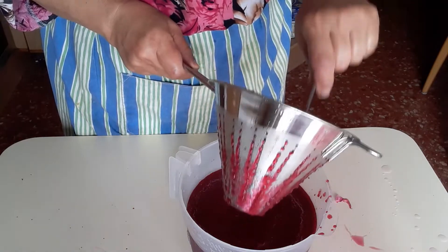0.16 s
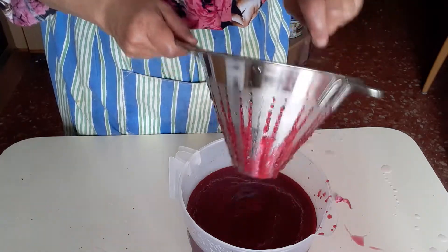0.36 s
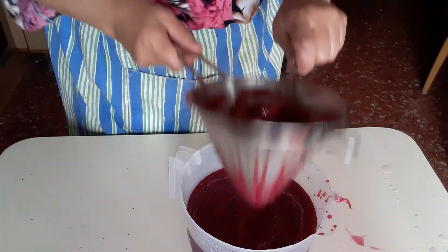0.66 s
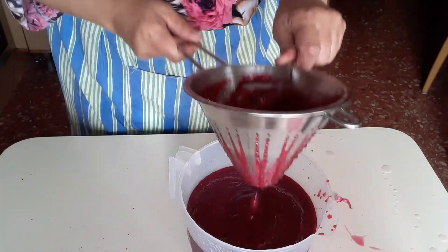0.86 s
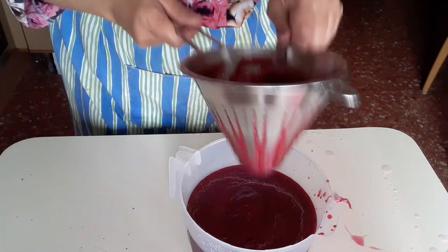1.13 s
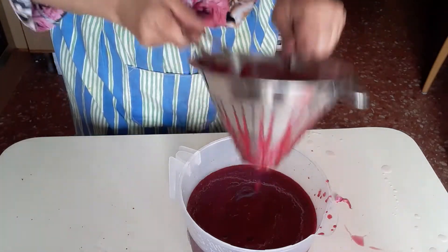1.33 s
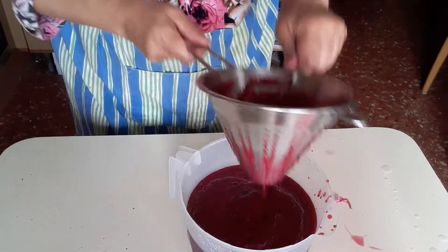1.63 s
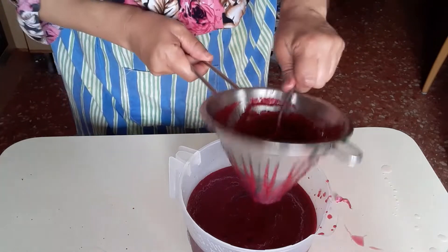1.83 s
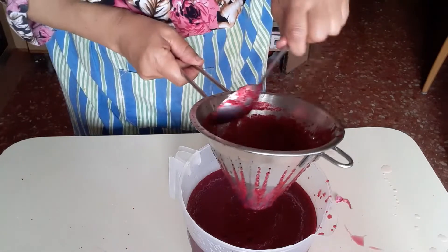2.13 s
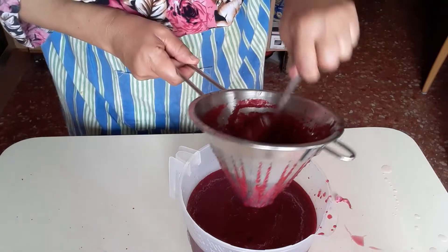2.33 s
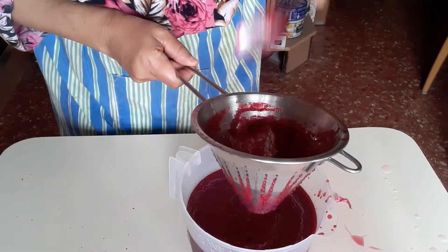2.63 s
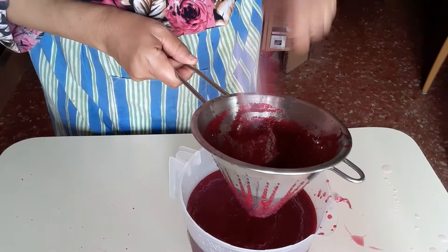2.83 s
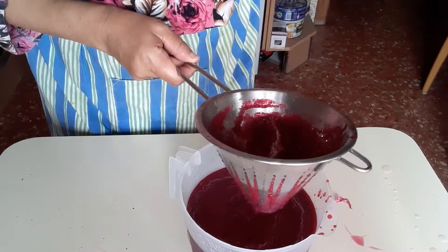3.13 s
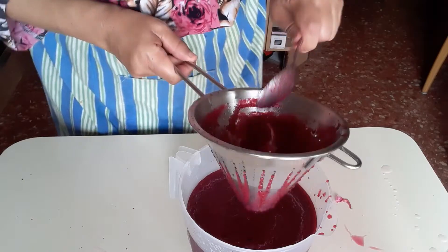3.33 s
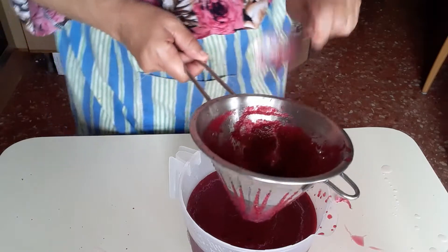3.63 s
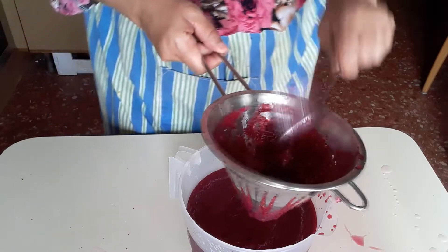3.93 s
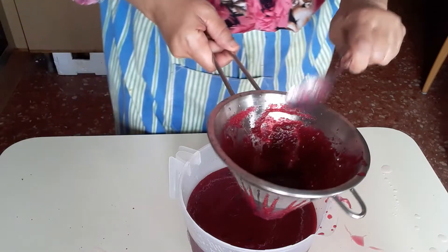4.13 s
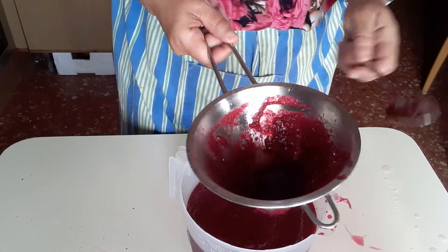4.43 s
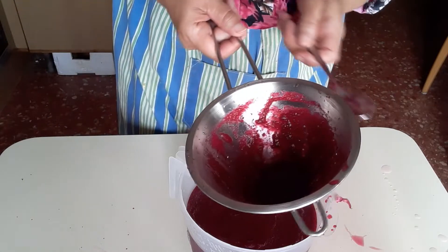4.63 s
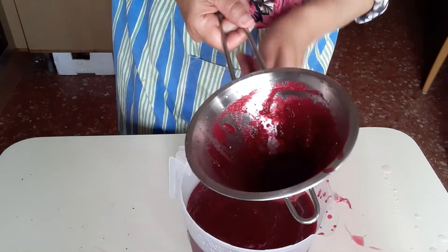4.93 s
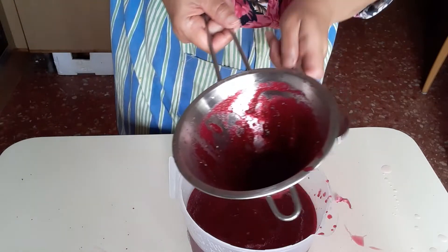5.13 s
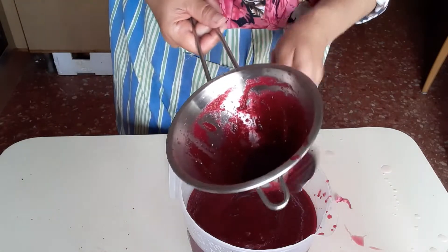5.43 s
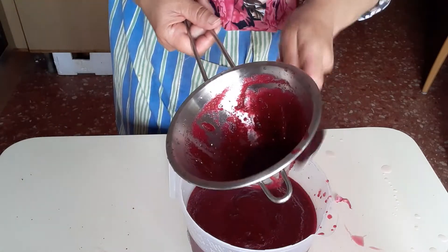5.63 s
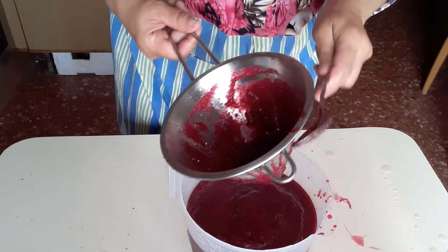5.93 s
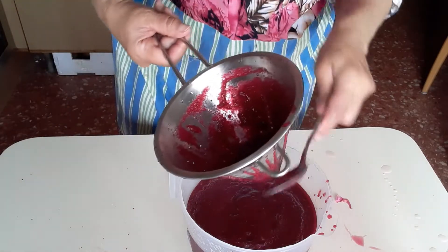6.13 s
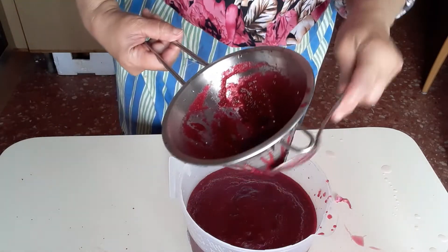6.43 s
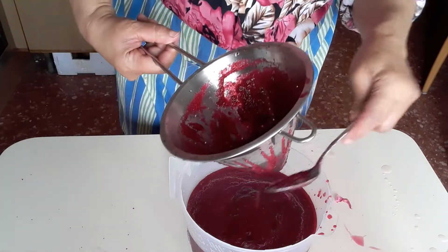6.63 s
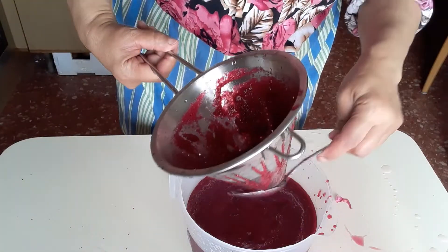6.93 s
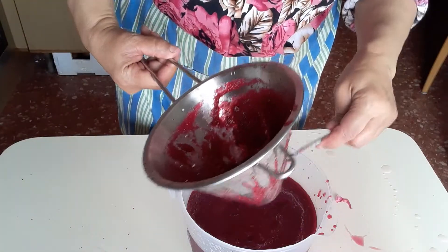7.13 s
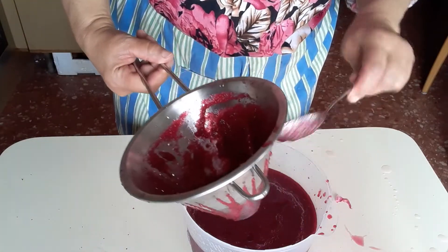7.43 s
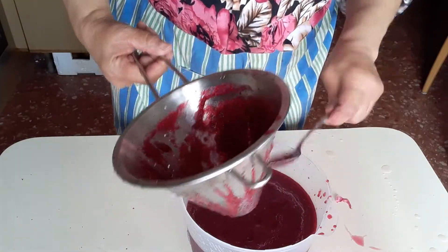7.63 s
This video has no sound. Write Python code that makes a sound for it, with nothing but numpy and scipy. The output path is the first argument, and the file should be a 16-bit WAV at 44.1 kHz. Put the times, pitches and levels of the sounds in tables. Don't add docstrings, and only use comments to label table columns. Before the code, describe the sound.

Short, bright metal knocks, damped by wet pulp, ring briefly in a reflective little kitchen. First come paired sharp raps, then a cluster of clanks and a wet scrape, then near quiet with faint squelchy rubbing. A heavy crack with fast rebounds breaks it, followed by coarse scrapes and clearer pinging taps along a perforated steel cone. Close microphones also pick up slight dripping, low outdoor traffic and faint electronic hiss.

```python
import sys
import numpy as np
from scipy import signal
from scipy.fft import rfft, irfft, next_fast_len
from scipy.io import wavfile

SR = 44100
rng = np.random.default_rng(int(sys.argv[2]) if len(sys.argv) > 2 else 0)


def transcribe(u):
    v = np.clip(np.atleast_2d(u).T, -1, 1)
    q = np.round(v * 32767).astype(np.int16)
    wavfile.write(sys.argv[1], SR, q)


def to_linear_factor(level_db):
    exponent = np.asarray(level_db, float) / 20
    return 10 ** exponent


N = 342657

# (frequency [Hz], width [Hz], level [dB])
RIM = [(1130, 51, -12), (1316, 54, -8), (2030, 100, -0.5), (2100, 39, -17), (2740, 21, -6.5),
       (2970, 110, -0.5), (4200, 120, -1.5), (6060, 60, -7), (6414, 100, -9.5), (7800, 90, -10),
       (9090, 100, -15.5), (9880, 60, -11), (10900, 240, -8), (12200, 120, -10.5), (13400, 120, -17.5)]
HANDLE = [(2600, 100, -1.5), (3430, 240, -2), (5900, 460, -13)]
UNDER_RIM = [(970, 240, -10), (1330, 73, -3), (2024, 67, 7), (3120, 120, -0.5), (4120, 200, -2.5),
             (6200, 150, -15)]
INNER_EDGE = [(421.3, 92, -10), (820, 200, 2), (1524, 39, 11.5), (2616, 200, -6)]
OUTER_EDGE = [(970, 120, -7.5), (1730, 370, 4.5), (2480, 210, 6.5), (4750, 60, -3), (6960, 37, -32)]
INNER_LOW = [(610, 530, -7.5), (1008, 52, -9), (1640, 40, -4.5), (2230, 250, -2.5), (3700, 41, -8.5),
             (6400, 39, -11)]
INNER_MID = [(840, 120, -1), (1640, 25, 3.5), (2400, 19, 0.5), (3400, 32, -3), (5414, 37, -13),
             (7670, 40, -21)]
INNER_HIGH = [(810, 290, -8), (1630, 14, 4.5), (2032, 98, -0.5), (2410, 290, -2.5), (3300, 170, -4.5),
              (5100, 210, -9.5), (6560, 64, -4), (7150, 92, -14.5), (9100, 50, -8.5), (11450, 65, -9)]
PULP_BED = [(945, 140, -2.5), (1380, 29, -7.5), (2250, 80, -9), (3356, 35, -0.5), (4470, 410, -6),
            (5170, 270, -6), (6140, 500, -8.5), (8270, 130, -9), (9580, 160, -10.5), (11040, 400, -12),
            (12900, 55, -14.5), (14250, 100, -21)]
OUTER_HIGH = [(944, 5.9, 3), (1850, 31, 1.5), (2270, 25, -5), (2810, 58, 2), (3490, 50, -24),
              (4110, 23, -16), (5430, 21, -7)]
OUTER_RIM = [(870, 40, 9.5), (1004, 5.7, -0.5), (1320, 24, -12.5), (2330, 32, 1), (3400, 100, -17),
             (4170, 200, -6), (5230, 32, -2)]
OUTER_MID = [(871, 6.7, 16.5), (1600, 11, -4), (1871, 12, 6.5), (2500, 20, 0.5), (4000, 17, -14.5),
             (5260, 20, -6)]
DENT = [(847, 6.7, 7.5), (1080, 100, -15), (1900, 90, -2), (3600, 40, -3)]
OUTER_LOW = [(780, 30, -2.5), (1060, 44, -1), (1810, 50, 8), (2500, 180, 0.5), (3580, 370, 3.5),
             (4750, 44.1, -4.5)]
NEAR_TIP = [(982, 48, 1.5), (1896, 4.3, 4.5), (2135, 20, -8), (4700, 70, -15.5)]
SEAM = [(880, 310, -11.5), (960, 82, -8), (3390, 53, 6.5), (4670, 84, -0.5), (6060, 110, 1.5),
        (9220, 33, 4), (8360, 35, -9.5), (10400, 170, -5.5), (12790, 50, -11), (13700, 82, 2),
        (14400, 80, -16)]
TIP = [(887, 91, -2.5), (2620, 41, -6.5), (3320, 17, 3.5), (3660, 150, 2.5), (4750, 50, 3.5),
       (6050, 190, 3), (8070, 44, 1.5), (9150, 85, 0), (10900, 60, -15.5), (12100, 31, 8.5),
       (13020, 20, 10.5), (14600, 40, 10.5), (15400, 50, 1.5)]
TIP_EDGE = [(890, 136, -1.5), (3450, 36, 8), (4840, 90, 0), (6270, 65, -1), (7700, 60, -15), (9150, 150, 5),
            (12300, 40, -2), (13050, 50, 5)]
HOLES = [(3600, 110, 1), (5630, 170, -1), (8250, 34, 5.5), (9500, 300, -1), (12400, 80, 7), (15400, 110, 2)]
# (frequency [Hz], width [Hz], share removed [0-1])
RIM_NODES = [(2560, 250, 0.7), (5850, 200, 1), (6760, 250, .8), (7600, 200, .8), (8600, 580, 0.5),
             (9505, 230, .9), (10250, 150, .8), (11250, 350, .7), (13100, 700, .8), (13900, 500, .7)]
BED_NODES = [(744, 180, 0.62), (2590, 230, .9), (5700, 390, 1), (6900, 320, .93), (8600, 250, .93),
             (13500, 700, .93)]
TIP_NODES = [(2770, 120, .85), (4540, 170, .97), (5550, 250, .85), (7400, 500, .97), (8630, 250, .95),
             (11600, 300, 0.93), (11900, 300, .9), (14150, 300, .85), (14900, 300, 0.92)]
SEAM_NODES = [(4350, 210, .9), (5100, 300, .93)]
EDGE_NODES = [(4200, 150, .8), (4400, 250, .95), (5650, 200, .8)]
UNDER_NODES = [(2500, 240, 0.76), (5700, 250, .93)]


def knocks(spread, broad_db):
    # (frequency [Hz], width [Hz], level [dB])
    air_modes = [(339, 14, -1), (419.6, 14, 0), (260, 1400, -25)]
    # (frequency [Hz], width [Hz], level [dB])
    spoon_modes = [(9080, 370, 0), (10300, 210, -6), (12200, 260, -7), (9200, 11000, -7)]
    # (place, boom [dB], low wall [dB], knocks (time [s], peak [dB], edge [dB], room share [dB]), nodes..)
    blow_table = [ (HANDLE, -42, -11, [(0.0164, -55, -10, -6.5), (0.0942, -33, -12, 11)]),
                  (PULP_BED, -27.5, 0, [(3.9585, -3, -16.5, 9.5), (3.982, -15.5, -17.5, 9.5),
                  (4.004, -15.5, -16.5, 12.5), (4.028, -17.5, -22, 12.5)], *BED_NODES),
                  (RIM, -27.5, 6.8, [(0.8525, -6.5, -13.5, 9), (.8548, -15, -10, 7.5)], *RIM_NODES),
                  (RIM, -28, 9, [(0.9812, -6.5, -27.5, 0)], *RIM_NODES),
                  (UNDER_RIM, -27, 5.4, [(1.5928, -23, -18, 9), (1.724, -21, -16, 4)], *UNDER_NODES),
                  (INNER_LOW, -19, -0.54, [(1.8657, -20.5, -10.5, 9.5)]),
                  (INNER_MID, -28, 1, [(2.1839, -16.5, -11.5, 9.5)]),
                  (INNER_EDGE, -18.5, 0.5, [(2.3106, -16, -3, 6)]),
                  (INNER_HIGH, -24, 2.1, [(2.359, -5.5, -13.5, 4.5)]),
                  (OUTER_HIGH, -20.5, 1, [(5.253, -21, -12.5, 11.5), (5.273, -24, -15.5, 11.5)]),
                  (OUTER_RIM, -16.5, 1, [(4.7835, -23.5, -14, 8)]),
                  (SEAM, -36, 5.2, [(5.4715, -9.5, -13.5, 9)], *SEAM_NODES),
                  (OUTER_MID, -32.5, -12, [(5.6246, -11.5, -14.5, 8), (5.632, -16, -12, 3),
                  (5.642, -21.5, -19, 3.5), (5.9638, -17.5, -11.5, 6)]),
                  (OUTER_LOW, -48.5, -1, [(6.121, -18, -20, 4.5)], (1350, 500, .7), (6500, 3300, 0.43)),
                  (DENT, -51, 0, [(6.4925, -30, -23, 7)]), (OUTER_EDGE, -39, 12, [(6.7501, -23, -17, 11)]),
                  (NEAR_TIP, -35.5, 1.3, [(6.3345, -13, -26, 2.5), (5.708, -26.5, -20, -1),
                  (5.733, -27, -19.5, -8)], (2800, 820, 0.65), (4500, 670, .8), (7100, 5000, .8),
                  (1400, 540, .6)), (TIP, -40, 4.4, [(6.2746, -12.5, -10.5, 11)], *TIP_NODES),
                  (TIP_EDGE, -24.5, 8.5, [(6.9795, -19, -10.5, 6)], *EDGE_NODES),
                  (HOLES, -58, -17.5, [(5.706, -31.5, 3, -3), (5.734, -26.5, -7, -8.5),
                  (6.481, -40.5, -11, 6), (6.506, -30.5, -17, 5.5)]), ]
    out = np.zeros((2, N))

    def power(rows, f):
        return sum(abs(modes([row])(f)) ** 2 for row in rows)

    boom = struck(lambda f: power(air_modes, f) / (1 + (210 / (f + 1)) ** 4))
    edge = struck(lambda f: power(spoon_modes, f))
    for wall, boom_db, low_db, blows, *nodes in blow_table:
        rows = [(hz, 40 + spread * w, level + low_db * (hz < 1400)) for hz, w, level in wall]
        rest = [(3350, 4100, broad_db), (850, 310, broad_db + low_db - 7.0)]
        body = struck(lambda f: power(rows, f) / (1 + (f / 15000) ** 4)
                      + power(rest, f) / (1 + (f / 11000) ** 4))
        for s, db, edge_db, wet_db in blows:
            ring = body + to_linear_factor(boom_db) * boom + to_linear_factor(edge_db + 6.5) * edge
            knock = to_linear_factor(db + 2.5) * filtered(ring, gaps(nodes))
            add(out, s, kitchen(knock, wet_db, early_db=-4.5))
    return out


def struck(power):
    cepstrum = irfft(np.log(power(np.fft.rfftfreq(8192, 1 / SR)) + 1e-12) / 2)
    cepstrum = cepstrum * np.r_[1, np.full(4095, 2), 1, np.zeros(4095)]
    ring = irfft(np.exp(rfft(cepstrum)))[:SR // 8]
    return ring / abs(ring).max()


def gaps(nodes):
    def response(f):
        notches = [1 - np.clip(share, 0, .99) * modes([(hz, w, 0)])(f) for hz, w, share in nodes]
        return np.prod(notches + [f ** 0], axis=0)
    return response


def strokes(rows, bending, bands):
    # (frequency [Hz], level [dB])
    drag_colour = [(300, -27), (700, -9.5), (1500, -3.5), (3000, 0.5), (5000, -2), (8000, -9),
                   (16000, -20.5)]
    # (frequency [Hz], level [dB])
    fizz_colour = [(3000, -25.5), (6000, -8), (9000, 3.5), (13000, -1.5), (16000, -15)]
    # (frequency [Hz], width [Hz], level [dB])
    wall_modes = [(1660, 91, -2), (2470, 340, 0), (3440, 140, 1.5), (4770, 370, -2.5), (6140, 270, 2.5),
                  (8500, 160, -3.5), (9800, 200, 5), (12300, 200, 11)]
    ends_db, roundness = -19.5, 1.79
    out = np.zeros((2, N))
    for s, lead, release, db, wet_db in rows:
        t, (away,), fade = played([(max(s - lead, 0), 1), (s, 0), (s + release, 1)])
        wetness = max(wet_db, 0)
        top_hz = 13000 / 2 ** (wetness / 20)
        dulled = lambda f: 1 + (f / top_hz) ** 4
        slips = rng.standard_normal((3, len(t))) * to_linear_factor(2.0 * rng.exponential(1, (3, len(t))))
        drag = unit(filtered(slips[0], lambda f: to_linear_factor(along(drag_colour, f))
                             * (1 + bands * abs(modes(wall_modes)(f))) / dulled(f)))
        fizz = unit(filtered(slips[1], lambda f: to_linear_factor(along(fizz_colour, f))))
        low = unit(filtered(slips[2], lambda f: sum(abs(modes([row])(f)) for row in bending) / dulled(f)))
        fizz_db = -5 - 1.2 * wetness
        pressure = fade * to_linear_factor(db - 6.5 + ends_db * away ** roundness)
        dry = pressure * (drag + to_linear_factor(fizz_db) * fizz + to_linear_factor(wet_db - 1.0) * low)
        add(out, t[0], kitchen(dry, wet_db=0.0, early_db=7.5))
    return out


def glides(table, width_hz, steady):
    # (start [dB], end [dB])
    first_db, last_db = (-5.5, -10)
    out = np.zeros((2, N))
    for s, length, from_hz, to_hz, top_db in table:
        middle = (s + length / 2, (from_hz + to_hz) / 2, 0)
        t, (hz, db), fade = played([(s, from_hz, first_db), middle, (s + length, to_hz, last_db)])
        flutter_hz = width_hz + .017 * hz.mean()
        flutter = rng.standard_normal((2, len(t)))
        flutter = unit(filtered(flutter, lambda f: 1 / (1 + (f / flutter_hz) ** 2)))
        flutter[0] += steady
        flutter = flutter / np.sqrt(np.mean(flutter ** 2))
        turn = 2 * np.pi * np.cumsum(hz) / SR
        tone = flutter[0] * np.cos(turn) + flutter[1] * np.sin(turn)
        add(out, t[0], kitchen(fade * to_linear_factor(top_db + db + 1.0) * tone, wet_db=-5.0, early_db=11.5))
    return out


def thump():
    # (time [s], level [dB], frequency [Hz], t60 [s])
    s, db, hz, t60 = (3.958, -28, 108, .085)
    t = np.arange(SR // 4) / SR
    parts = [(1, 1), (.6, 1.7), (.5, .7)]
    push = sum(strength * np.sin(2 * np.pi * ratio * hz * t) for strength, ratio in parts)
    push = push * to_linear_factor(-60 * t / t60) * (1 - np.exp(-t / .006))
    out = np.zeros((2, N))
    add(out, s, to_linear_factor([[db - 5], [db + 3.5]]) * push)
    return out


def squeak():
    # (start [s], end [s], frequency [Hz], level [dB])
    t0, t1, hz, db = (5.192, 5.245, 2830, -72)
    size = round((t1 - t0) * SR)
    whistle = noise(2800, lambda f: modes([(hz, 150, 0)])(f) ** 2)[:, :size]
    out = np.zeros((2, N))
    add(out, t0, to_linear_factor(db) * np.hanning(size) ** .3 * whistle)
    return out


def outdoors():
    # (time [s], level [dB])
    traffic = [(0, -63.5), (.27, -60.5), (.44, -62.5), (.5, -68), (.6, -63), (.9, -71), (1.25, -75.5),
               (1.56, -73), (2.0, -63), (3.0, -69.5), (3.5, -67.5), (3.9, -70), (4.35, -77.5),
               (4.65, -69.5), (5.15, -73.5), (5.9, -56.5), (6.65, -66.5), (7.5, -69)]
    # (time [s], level [dB])
    heavy_traffic = [(0.0, -74), (0.89, -68.5), (1.301, -76.5), (2.32, -71), (3.14, -78), (3.98, -65.5),
                     (4.13, -76.5), (5.35, -77), (5.52, -72.5), (6.119, -73), (6.71, -69.5), (7.53, -79),
                     (7.77, -68.5)]
    # (mean level [dB], swing per dB of traffic strength [dB])
    far_levels = [
        (-72.5, 1.46),
        (-73, 0.42),
    ]
    # (frequency [Hz], width [Hz], level [dB])
    drone_modes = [(332, 27, 4.5), (466, 90, 2), (770, 60, -17.5)]
    # (frequency [Hz], density [dB per Hz])
    rush_colour = [(300, -29), (500, -12), (900, -16.5), (1400, -20.5), (2200, -27.5), (5000, -42),
                   (11000, -69)]
    # (frequency [Hz], density [dB per Hz])
    rumble_colour = [(15, -48), (25, -22), (43, -8.5), (80, -7.5), (119, 2), (268, -6.5), (300, -1),
                     (390, -30.5), (660, -120)]
    # (frequency [Hz], density [dB per Hz])
    hiss_colour = [(1180, -31), (2000, -2), (3710, -2), (5770, -4), (7520, -2), (13500, -1.5), (15800, -5),
                   (16500, -13)]
    t = np.arange(N) / SR
    strength = np.interp(t, *np.transpose(traffic))
    heavy = np.interp(t, *np.transpose(heavy_traffic))
    levels = [db + swing * (strength - strength.mean()) for db, swing in far_levels] + [heavy + 1.6]
    colours = [lambda f: abs(modes(drone_modes)(f)) ** 2.4,
               lambda f: to_linear_factor(along(rush_colour, f)),
               lambda f: to_linear_factor(along(rumble_colour, f))]
    far = np.zeros((2, N))
    for db, colour in zip(levels, colours):
        sway = np.interp(t, np.arange(120) / 14, rng.standard_normal(120))
        far += to_linear_factor(db + 5 * np.tanh(sway)) * noise(N, colour)
    return far + to_linear_factor(-82 + 2.5) * noise(N, lambda f: to_linear_factor(along(hiss_colour, f)))


def kitchen(x, wet_db, early_db, gap=0.0026):
    # (frequency [Hz], t60 [s])
    tail_t60 = [(100, 0.39), (350, 0.52), (1000, 0.33), (4000, 0.35), (8000, 0.33), (12000, .29),
                (14200, 0.34), (15800, 0.19)]
    hz, t = np.fft.rfftfreq(256, 1 / SR), np.arange(170) * 128 / SR
    slow_t60 = along(tail_t60, hz)
    quick_t60 = np.minimum(0.17, slow_t60)
    decay = to_linear_factor(-60 * t[:, None] / slow_t60) + to_linear_factor(early_db - 60 * t[:, None] / quick_t60)
    decay = decay * to_linear_factor(-2 * hz / 10000)
    tail = signal.istft(pair(hz, len(t)) * decay, SR, nperseg=256, time_axis=1, freq_axis=2)[1]
    s = np.arange(tail.shape[1]) / SR
    glints = 0.23 * tail / tail[:, :256].std() * to_linear_factor(-60 * s / 0.015)
    tail = tail * np.clip(s / gap - 1, 0, 1)
    tail = to_linear_factor(wet_db) * tail / np.linalg.norm(tail[0]) + glints
    tail[[0, 1], [0, 2]] = 1
    return signal.fftconvolve(x[None], tail, axes=1)


def pair(hz, *shape):
    # (frequency [Hz], left-right likeness [0-1])
    likeness = [(60, 0.95), (150, 0.27), (350, 0.94), (700, 0.36), (1500, 0.25), (3000, 0.098),
                (10000, 0.041)]
    turn = np.arccos(np.clip(along(likeness, hz), -1, 1)) / 2
    re, im = rng.standard_normal((2, 2, *shape, len(hz)))
    mid = (re[0] + 1j * im[0]) * np.cos(turn)
    side = (re[1] + 1j * im[1]) * np.sin(turn)
    return np.array([mid + side, mid - side])


def noise(size, colour):
    m = next_fast_len(size)
    hz = np.fft.rfftfreq(m, 1 / SR)
    return unit(irfft(pair(hz) * colour(hz), m)[:, :size])


def modes(rows):
    return lambda f: sum((-1) ** k * to_linear_factor(db) * 1j * f * w / (c * c - f * f + 1j * f * w)
                         for k, (c, w, db) in enumerate(rows))


def filtered(x, response):
    m = next_fast_len(x.shape[-1] + 4096)
    return irfft(rfft(x, m) * response(np.fft.rfftfreq(m, 1 / SR)), m)[..., :x.shape[-1]]


def along(points, hz):
    f, v = np.transpose(points)
    return np.interp(np.log(hz + 1), np.log(f + 1), v)


def played(rows):
    s, *cols = np.transpose(rows)
    t = s[0] + np.arange(round((s[-1] - s[0]) * SR)) / SR
    fade = np.clip(np.minimum(t - t[0], t[-1] - t) / .014, 0, 1)
    return t, [np.interp(t, s, c) for c in cols], fade


def unit(x):
    return x / np.sqrt(np.mean(x ** 2) + 1e-20)


def add(out, s, x):
    part = out[:, round(s * SR):][:, :x.shape[1]]
    part += x[:, :part.shape[1]]


def scene():
    # (firmest [s], lead-in [s], let-go [s], drag [dB], wetness [dB])
    presses = [(0.045, 0.052, 0.036, -57, 1), (2.305, 0.072, 0.08, -29.5, -16.5),
               (2.69, .045, 0.054, -62.5, 6), (2.71, 0.092, 0.15, -72.5, 26),
               (3.28, 0.16, 0.16, -62, -35.5), (3.44, 0.06, 0.081, -63.5, -23.5),
               (3.475, 0.045, 0.16, -83.5, 29), (3.7, 0.11, 0.25, -77, -13.5)]
    # (firmest [s], lead-in [s], let-go [s], drag [dB], wetness [dB])
    scrapes = [(4.89, 0.05, 0.068, -33.5, -16.5), (4.955, 0.034, 0.044, -40.5, -5.5),
               (5.3, 0.028, 0.11, -33.5, -8.5), (5.645, 0.02, 0.063, -41, -14),
               (5.7, 0.042, 0.075, -35.5, -7), (5.985, .02, 0.052, -42, -0.5),
               (6.11, 0.072, 0.051, -41, -22), (6.5, 0.068, 0.06, -44, -7), (6.8, 0.024, 0.037, -42.5, 0.5),
               (7.0, .015, 0.045, -42, -2), (7.1, 0.089, 0.068, -45.5, -37.5), (7.16, .03, 0.054, -42, 4),
               (7.235, 0.095, 0.073, -41, -5)]
    # (firmest [s], lead-in [s], let-go [s], drag [dB], wetness [dB])
    slides = [(3.085, .015, 0.1, -58, 1.5), (3.14, 0.06, .11, -61, -4), (3.3, 0.14, 0.099, -69.5, -20),
              (2.9, 0.027, .05, -74, -2)]
    # (frequency [Hz], width [Hz], level [dB])
    squelch = [(338, 120, 7.5), (459.5, 160, 6), (800, 400, -6), (1600, 600, -13.5), (200, 140, -1)]
    # (frequency [Hz], width [Hz], level [dB])
    cone_bending = [(955, 66, 8), (960, 42, 5), (328, 56, -10.5), (710, 530, -7.5)]
    # (frequency [Hz], width [Hz], level [dB])
    smear = [(720, 150, 0), (1280, 570, 2)]
    # (start [s], length [s], from [Hz], to [Hz], level [dB])
    wall_glides = [(2.283, 0.088, 2850, 2400, -42.5), (5.275, 0.029, 2860, 2850, -44.5),
                   (6.46, 0.04, 1810, 1600, -55), (6.486, 0.055, 3900, 3800, -49),
                   (6.1, .06, 3650, 4000, -53), (7.08, .07, 5200, 5000, -58.5),
                   (7.045, 0.071, 3650, 4100, -45), (7.09, 0.051, 3750, 3650, -47),
                   (7.085, 0.071, 2800, 3500, -58.5), (7.15, 0.022, 2740, 2560, -36.5),
                   (7.158, 0.028, 2050, 2100, -46), (7.185, 0.047, 1800, 1750, -43.5),
                   (7.015, 0.093, 1030, 970, -48), (7.085, 0.078, 850, 1200, -49),
                   (6.1, 0.028, 1100, 800, -47), (4.87, 0.036, 2060, 1820, -50),
                   (4.94, 0.039, 750, 1100, -55), (4.5, 0.029, 1800, 1800, -61.5),
                   (7.17, 0.055, 880, 840, -40), (7.215, 0.077, 820, 850, -67)]
    # (start [s], length [s], from [Hz], to [Hz], level [dB])
    trickles = [(0.33, 0.17, 345, 340, -69.5), (4.445, 0.0421, 450, 470, -73.5),
                (4.495, 0.022, 290, 550, -71), (4.52, 0.04, 530, 840, -80), (4.655, 0.037, 1400, 1410, -80),
                (4.6, 0.108, 510, 460, -68), (4.72, 0.045, 690, 885, -77), (2.06, .08, 450, 530, -65),
                (0.33, 0.14, 460, 420, -65.5), (0.67, .16, 350, 420, -69.5), (5.83, .1, 580, 430, -65),
                (7.68, 0.084, 230, 350, -73)]
    rubs = strokes(presses, squelch, bands=0)
    rubs += strokes(scrapes[:2], cone_bending, bands=0.56)
    rubs += strokes(scrapes[2:], cone_bending, bands=2.2)
    rubs += strokes(slides, smear, bands=0)
    moving = glides(wall_glides, width_hz=51, steady=.5) + glides(trickles, width_hz=28, steady=1.0)
    return knocks(spread=1.2, broad_db=-11.5) + thump() + rubs + moving + squeak() + outdoors()


def roll_off(x):
    return signal.sosfilt(signal.butter(12, 16970, fs=SR, output="sos"), x)


def record(dry):
    # (frequency [Hz], left over right [dB])
    port_colour = [(60, -1.5), (110, -3.5), (200, 0.5), (380, -3.5), (700, 0.5), (1290, -1.5), (2380, 0.5),
                   (4400, -1.5), (8120, -0.5), (15000, 4.5)]
    ports = filtered(dry, lambda f: to_linear_factor(np.outer([.5, -.5], along(port_colour, f))) / (1 + (f / 15850) ** 240))
    held = np.clip(ports, -.84, .84)
    return roll_off(held)


dry = scene()
out = record(dry)
transcribe(out)
```